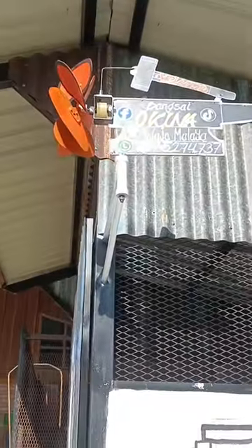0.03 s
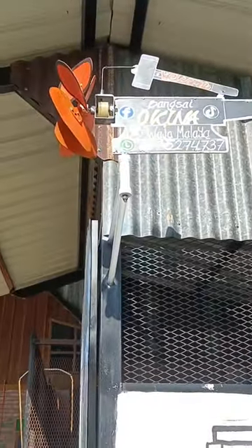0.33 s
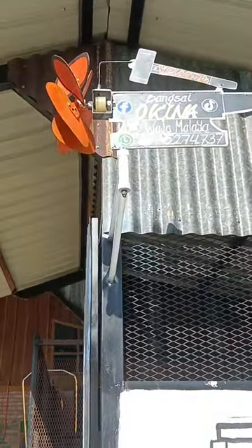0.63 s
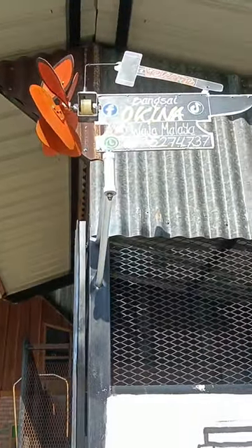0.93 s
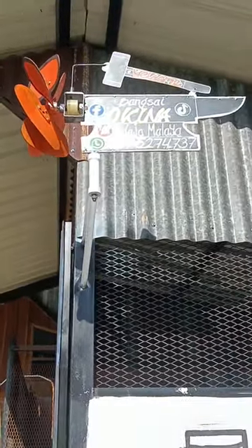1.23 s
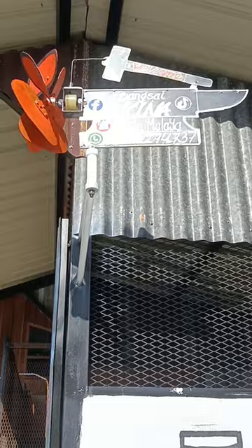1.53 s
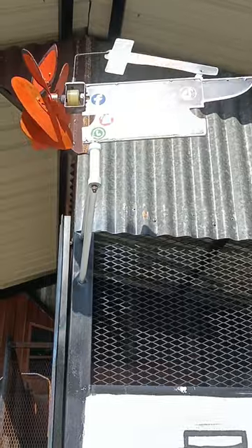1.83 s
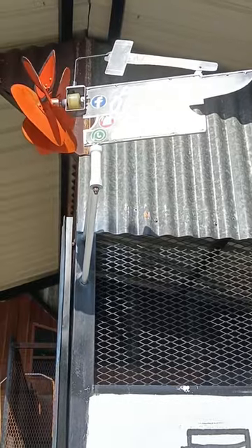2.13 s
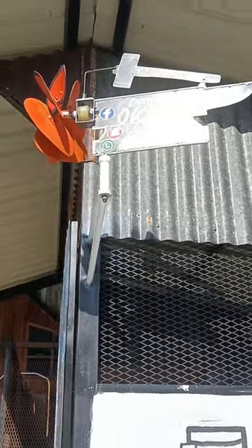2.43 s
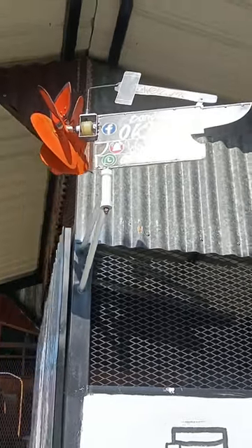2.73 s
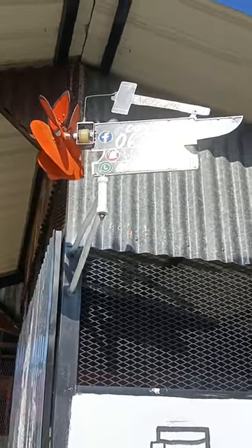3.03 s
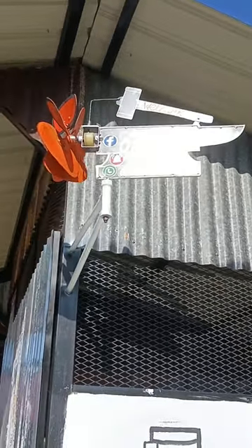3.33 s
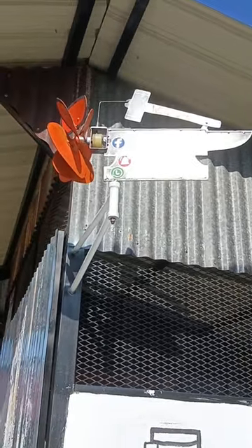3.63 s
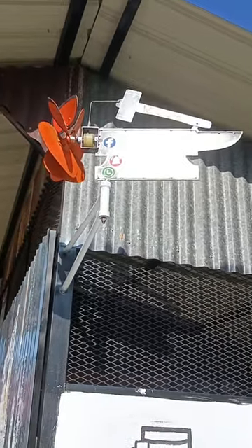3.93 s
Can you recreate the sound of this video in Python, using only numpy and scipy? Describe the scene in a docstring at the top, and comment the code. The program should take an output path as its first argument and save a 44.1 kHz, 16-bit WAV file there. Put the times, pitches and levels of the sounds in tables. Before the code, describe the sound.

A vehicle passes outdoors near a metal shed, its tyre roar swelling and then dropping away halfway through. Wind rumbles and thumps on the microphone, while small birds chirp and then chatter under the roof over distant traffic.

```python
"""A tyre roar swells and drops away after two seconds as a vehicle passes a metal shed on a breezy day.
The roar mixes with its own reflection off the ground, over a steady hum of distant traffic.
Small birds call and chatter, echoing under the roof. Wind rumbles and thumps on the two microphone
ports (openings), with a fine high rustle on the left and one sharp tick close by."""
import sys
import numpy as np
from scipy import signal
from scipy.fft import rfft, irfft, next_fast_len
from scipy.io import wavfile
from scipy.ndimage import uniform_filter1d, map_coordinates

SR = 44100
rng = np.random.default_rng(int(sys.argv[2]) if len(sys.argv) > 2 else 0)


def pcm_store(signal):
    """Save signal as 16-bit PCM."""
    levels = np.round(np.clip(np.atleast_2d(signal), -1, 1) * 32767)
    wavfile.write(sys.argv[1], SR, levels.astype(np.int16).T)


N = 176400
ROAD_LAG_MS = 0.16  # the left port hears the road this much later


def amp(db):
    """Turn decibels into a gain to multiply by."""
    return 10 ** (np.asarray(db) / 20)


def unit(x):
    """Scale a signal to an average strength (rms) of 1."""
    return x / np.sqrt(np.mean(x ** 2) + 1e-20)


def along(points, hz):
    """Read between (f/Hz, value) points on a log frequency axis."""
    f, v = np.transpose(points)
    return np.interp(np.log(hz + 1), np.log(f + 1), v)


def curve(rows):
    """Join (t/s, value) points with straight lines, one value per sample."""
    return np.interp(np.arange(N) / SR, *np.transpose(rows))


def wobble(rate, size=N):
    """A smooth curve through `rate` random values a second."""
    return map_coordinates(rng.standard_normal(size // 8), [np.arange(size) * rate / SR], mode="mirror")


def pan(db):
    """Left and right gains of constant power for a balance in dB; above 0 the left is louder."""
    gains = amp(np.array([np.atleast_1d(db), -np.atleast_1d(db)]) / 2)
    return gains / np.sqrt(np.mean(gains ** 2, axis=0))


def add(track, s, sound):
    """Mix a sound in at s seconds."""
    part = track[:, max(0, round(s * SR)):][:, :sound.shape[-1]]
    part += sound[..., :part.shape[-1]]


def filtered(x, response):
    """Multiply each frequency in x by response(hz)."""
    size = x.shape[-1]
    padded = next_fast_len(size + SR // 8)
    return irfft(rfft(x, padded) * response(np.fft.rfftfreq(padded, 1 / SR)), padded)[..., :size]


def rush(tone, balance, alike, lag_ms, patchy_db):
    """Stereo noise of rms 1, late on the left. alike lists f/Hz, likeness of the two sides (0 to 1)."""
    spectra = signal.stft(rng.standard_normal((2, N)), nperseg=1024)[2]
    # random louder and softer patches across pitch and time
    patches = uniform_filter1d(rng.standard_normal(spectra.shape[1:]), size=4, axis=0)
    patches = uniform_filter1d(patches, size=14, axis=1)
    pair = signal.istft(spectra * amp(patchy_db * unit(patches)), nperseg=1024)[1][:, :N]

    def colour_and_width(hz):
        angle = np.arccos(np.clip(along(alike, hz), -1, 1)) / 2
        return amp(along(tone, hz)) * [np.cos(angle), np.sin(angle)]

    mid, side = filtered(pair, colour_and_width)
    stereo = np.array([mid + side, mid - side])
    delay_s = np.array([[lag_ms], [0]]) / 1000
    return unit(filtered(stereo, lambda hz: pan(along(balance, hz)) * np.exp(-2j * np.pi * hz * delay_s)))


def background():
    """Steady distant traffic and faint hiss."""
    tone = [(25, -10), (70, 4.5), (140, -15), (250, -11.5), (400, -17), (750, -26), (1350, -36),
            (2300, -31), (3800, -35), (6200, -27), (8000, -45), (9400, -61), (10400, -18.5), (11200, -83),
            (15000, -65)]  # tone colour: f/Hz, relative level/dB
    balance = [(100, 18.5), (1500, -17.5), (6000, -8), (9000, -5), (10400, 18), (14000, -13)]  # f/Hz, left minus right/dB
    alike = [(150, 0.99), (1500, 0.28), (5000, 0.11)]
    return amp(-68.5) * rush(tone, balance, alike, lag_ms=0.1, patchy_db=1.5)


def rustle():
    """A fine, grainy, very high rustle near the left port, with a few crisp crackles."""
    loudness = [(0, -74), (.2, -82), (.25, -53.5), (.3, -75), (.5, -64.5), (.6, -71.5), (1.5, -64),
                (2.28, -70), (2.33, -74), (2.41, -67), (2.46, -72), (2.52, -72), (2.58, -66), (2.66, -68),
                (2.72, -73), (2.77, -68.5), (2.88, -66.5), (2.92, -68.5), (3.2, -80.5), (3.35, -69),
                (3.43, -86.5), (4, -76.5)]  # rise and fall of the rustle: t/s, level/dB
    tone = [(6000, -9.5), (9300, -17.5), (10400, 1.5), (11100, 0), (11700, -2.5), (12300, -2.5),
            (13200, -6), (15000, -31)]  # tone colour: f/Hz, relative level/dB
    crackle_starts = [(2.755, -56), (2.845, -53), (2.884, -52), (3.062, -63.5), (3.285, -62), (3.334, -64)]  # t/s, level/dB
    t = np.arange(N) / SR
    fade_s = 0.01  # time for a crackle to fall by 60 dB
    grains = amp(curve(loudness)) * unit(amp(2.7 * wobble(260)))
    crackles = sum((t >= s) * amp(db - 60 * np.abs(t - s) / fade_s) for s, db in crackle_starts)
    hiss = rush(tone, balance=[(10000, 15.5)], alike=[(10000, 0.0037)], lag_ms=0, patchy_db=3.0)
    return (grains + crackles) * hiss


def tick():
    """One tiny dry tap that rings briefly and reaches the left port first."""
    taps = [(0.4247, -34, 3.1)]  # t/s, gain/dB, left minus right/dB
    modes = [(2860, 12.6, 0.0017), (6430, 6.4, 0.0012), (12100, 14.8, 0.001)]  # ringing tones: f/Hz, relative level/dB, time to fall 60 dB/s
    out, t = np.zeros((2, N)), np.arange(SR // 50) / SR
    delay_s = np.array([[0], [0.00029]])
    age = np.maximum(t - delay_s, 0)
    ring = sum(amp(db - 60 * age / fade_s) * np.sin(2 * np.pi * hz * age) for hz, db, fade_s in modes)
    for s, db, pan_db in taps:
        add(out, s, amp(db) * pan(pan_db) * ring)
    return out


def note(start_hz, end_hz, length_s, warble):
    """One gliding bird note whose pitch shakes by the fraction `warble`."""
    progress = np.linspace(0, 1, int(length_s * SR))
    glide_hz = start_hz + (end_hz - start_hz) * progress
    hz = glide_hz * (1 + warble * wobble(697, size=SR // 4)[:len(progress)])
    envelope = np.abs(np.sin(np.pi * progress ** 0.35))  # quick rise, slower fall
    return unit(envelope * np.sin(2 * np.pi * np.cumsum(hz) / SR))


def under_roof(x, echo_db, fade_s=0.26):
    """A note, a little to the left, and its scattered echoes from the roof and walls."""
    t = np.arange(SR // 2) / SR
    tail = rng.standard_normal((2, len(t))) * amp(-60 * t / fade_s)
    response = amp(echo_db) * tail / np.linalg.norm(tail[0])
    response[0, 5] += 1  # the direct sound, five samples later on the left
    response[1, 0] += 1
    return pan(3.5) * signal.fftconvolve(x[None], response, axes=1)


def birds():
    """Thin far calls, a few raspy falling chirps and a nearer run of harsh chatter."""
    # calls that fall by a tenth of their pitch: t/s, relative level/dB, start f/Hz, length/s
    thin_calls = [(.085, -58.5, 7000, 0.029), (0.31, -58, 6800, 0.036), (0.798, -60, 7100, 0.047),
                  (.865, -53.5, 5670, 0.019), (1.099, -56, 6600, 0.028), (1.392, -55.5, 6690, 0.033),
                  (1.64, -55.5, 6530, 0.031), (1.80, -49.5, 5580, 0.022), (1.991, -61.5, 6850, 0.07),
                  (2.073, -54, 6010, 0.043), (2.12, -61.5, 6770, 0.041), (2.193, -62.5, 6890, 0.12),
                  (2.325, -57, 5580, 0.041), (2.409, -58.5, 6750, 0.0363), (2.6, -59.5, 6820, 0.051),
                  (2.847, -63.5, 6760, 0.058), (3.298, -61.5, 6790, 0.02), (3.495, -65.5, 6810, 0.058),
                  (3.943, -64.5, 7000, 0.031)]
    # slurred chirps: t/s, relative level/dB, start f/Hz, end f/Hz, length/s, warble
    chirps = [(2.41, -68.5, 3930, 3580, 0.05, 0.037), (2.527, -58, 3310, 3240, 0.012, .015),
              (2.948, -69.5, 3280, 3220, 0.045, 0.012), (3.857, -57.5, 4380, 4370, 0.0086, 0.02),
              (3.862, -66.5, 4080, 2480, 0.051, 0.044)]
    chatter = [(2.52, -56.5, 4640, 0.016), (2.655, -54.5, 4975, 0.029), (2.787, -56.5, 4740, 0.017),
               (2.847, -55.5, 5020, 0.05), (2.909, -55, 5140, 0.042), (2.96, -53, 4930, 0.022),
               (3.019, -53, 5270, 0.026), (3.083, -56.5, 5010, .032), (3.138, -57, 4780, 0.025)]  # harsh notes: t/s, level/dB, f/Hz, length/s
    partials = [(0.669, -5.5), (.77, 5.5), (0.879, 7), (0.999, 13.5), (1.3, -7.5), (1.549, -14)]  # tones in a harsh note: multiple of its pitch, relative level/dB
    out = np.zeros((2, N))
    for s, db, hz, length_s in thin_calls:
        call = note(hz, 0.9 * hz, length_s, warble=0.03)
        add(out, s, amp(db - 7.5) * under_roof(call, echo_db=3))
    for s, db, start_hz, end_hz, length_s, warble in chirps:
        chirp = note(start_hz, end_hz, length_s, warble)
        add(out, s, amp(db + 6) * under_roof(chirp, echo_db=-3))
    for s, db, hz, length_s in chatter:
        rasp = sum(amp(level) * note(hz * k, hz * k, length_s, warble=0.028) for k, level in partials)
        add(out, s, amp(db) * under_roof(unit(rasp), echo_db=-6))
    return out


def wind():
    """Wind on the ports: a lumpy rumble whose strongest lumps break into brighter puffs."""
    gusts = [(0, -47), (.2, -49), (.45, -39), (.7, -48), (.9, -51), (1.2, -45.5), (1.5, -48.5),
             (1.98, -48.5), (2.3, -58.5), (2.6, -64.5), (2.9, -57), (3.3, -67)]  # rise and fall of the wind: t/s, level/dB
    rumble_tone = [(20, -49), (40, -4), (65, 3.5), (125, 8.5), (180, -1.5), (260, -20.5), (400, -54),
                   (700, -26), (1500, -89)]  # deep rumble: f/Hz, relative level/dB
    puff_tone = [(100, -21), (200, -3.5), (310, -6), (450, -8.5), (700, -16), (1500, -74)]  # its fluttering upper edge: f/Hz, relative level/dB
    balance = [(30, -17), (70, -13.5), (150, 0), (400, -6)]  # f/Hz, left minus right/dB
    lumps_db = 5 * np.array([wobble(35.06), wobble(35)])
    rumble = rush(rumble_tone, balance, alike=[(60, 1.0), (200, 0.97)], lag_ms=0.28, patchy_db=1.0)
    puffs = rush(puff_tone, balance, alike=[(300, 0.22)], lag_ms=0, patchy_db=2.0)
    rumble = unit(amp(lumps_db) * rumble)
    puffs = unit(amp(1.6 * lumps_db) * puffs)  # the puffs swing wider than the rumble
    return amp(curve(gusts)) * (rumble + amp(-21.5) * puffs)


def eddies():
    """Single swirls of air that hit a port, each a short low thump roughened with noise."""
    hits = [(.12, -36.5, 147.5, 0.017, 7), (0.246, -28, 122, 0.0067, -11), (0.284, -35, 113, 0.0063, 0),
            (0.322, -35, 160, 0.0084, -5), (0.417, -34.5, 115, 0.031, -13), (.437, -36, 142, 0.012, -13),
            (0.472, -27, 135, 0.0028, 3), (.54, -43.5, 140, 0.029, -31), (0.612, -29.5, 121, 0.0061, -23),
            (0.653, -32.5, 102, 0.013, -30), (.683, -36, 112, 0.0032, -20), (0.76, -35.5, 96.3, 0.0095, -8),
            (0.593, -45, 218, 0.0082, -23), (0.741, -43.5, 173, 0.0053, -4), (1.027, -26, 107, 0.0066, -16),
            (1.458, -33.5, 135, 0.022, -7), (1.568, -37.5, 160, 0.0099, 2), (1.869, -31.5, 119, 0.014, -26),
            (2.709, -34.5, 126, 0.0076, -23), (2.83, -44, 142.1, 0.0049, 24), (2.931, -39, 90, 0.0071, -25),
            (2.989, -33, 173, 0.0044, 35), (3.082, -36, 104, 0.0077, -33), (3.216, -42.5, 132, 0.011, 27),
            (3.335, -32, 82, 0.0063, 27), (3.419, -29.5, 305, 0.0075, 35), (3.422, -22.5, 231, 0.0045, 41),
            (3.442, -18.5, 130, 0.0073, 47), (3.459, -31, 134, 0.016, 36), (3.505, -17, 210.5, 0.0057, 50),
            (3.519, -31, 190, 0.0043, 39), (3.708, -39, 144, 0.0065, 18), (3.947, -37, 94, 0.0089, 39),
            (3.98, -21, 139, 0.0032, 36)]  # t/s, level/dB, f/Hz, half-length/s, left minus right/dB
    roughness, top_ratio, steepness = 0.37, 1.61, 5.53  # the noise dies away above top_ratio * hz
    out, t = np.zeros((2, N)), np.arange(-SR // 10, SR // 10) / SR
    for s, db, hz, half_s, pan_db in hits:
        swing = np.sin(2 * np.pi * (hz * t + rng.random()))
        band = lambda f: f / (f + hz / 2) / np.sqrt(1 + (f / (top_ratio * hz)) ** (2 * steepness))
        swirl = unit(filtered(rng.standard_normal(len(t)), band))
        envelope = 1 / np.cosh(np.clip(1.58 * t / half_s, -20, 20))
        thump = envelope * (swing + roughness * swirl) / np.sqrt(2)
        add(out, s + t[0], amp(db) * pan(pan_db) * thump)
    return out


def snaps(rise_s=0.0003):
    """Sudden, dull jumps in air pressure inside the hardest eddies."""
    jumps = [(3.4255, -37, 38), (3.504, -52, 38)]  # t/s, peak level/dB, left minus right/dB
    out = np.zeros((2, N))
    age = np.arange(SR // 50) / SR / rise_s  # counted in rise times
    pulse = 4 * age ** 2 * (1 - age / 3) * np.exp(-age)
    for s, db, pan_db in jumps:
        add(out, s, amp(db) * pan(pan_db) * pulse)
    return out


def whines(width_hz=50):
    """Narrow bands of the tyre roar that ring out for a moment."""
    swells = [(0.035, -59, 700, 0.051), (1.448, -50.5, 805, 0.023), (1.12, -63, 1950, 0.049),
              (1.46, -62, 2180, 0.077), (1.967, -61, 840, 0.057), (1.754, -54, 1900, 0.025),
              (1.665, -56.5, 1000, 0.049), (1.84, -61, 740, 0.049)]  # t/s, level/dB, f/Hz, half-length/s
    out, t = np.zeros((2, N)), np.arange(N) / SR
    delay_s = np.array([[ROAD_LAG_MS], [0]]) / 1000
    for s, db, hz, half_s in swells:
        flutter = wobble(width_hz) + 1j * wobble(width_hz)  # random strength and phase
        whine = unit(np.real(flutter * np.exp(2j * np.pi * hz * (t - delay_s))))
        envelope = np.exp(-0.5 * ((t - s) / half_s) ** 2)
        out += amp(db) * envelope * whine
    return out


def swept(x, boost_db=4.5, width_octaves=0.27):
    """A broad resonance in the roar that climbs as the vehicle nears and sinks as it leaves."""
    centre = [(0, 1440), (.25, 1380), (.55, 1270), (.8, 1530), (1.05, 1590), (1.3, 1800), (1.5, 1900),
              (1.75, 1480), (1.95, 1180), (2.2, 1500)]  # middle of the resonance: t/s, f/Hz
    hz, t, spectra = signal.stft(x, SR, nperseg=1024)
    octaves_away = np.log2((hz[:, None] + 1) / np.interp(t, *np.transpose(centre)))
    gain = amp(boost_db * np.exp(-0.5 * (octaves_away / width_octaves) ** 2))
    return unit(signal.istft(spectra * gain, nperseg=1024)[1][:, :N])


def reflected(x, share=0.36, top_hz=1400):
    """Road noise plus its duller echo off the ground, whose changing delay makes a hollow sweep."""
    delay_ms = [(0, 1.27), (.5, 0.98), (.9, 0.81), (1.2, 0.86), (1.45, 1.5), (1.85, 1.79), (2.2, 1.9)]  # extra travel time of the echo: t/s, delay/ms
    positions = np.arange(N) - curve(delay_ms) * SR / 1000
    echo = np.array([map_coordinates(side, [positions], mode="mirror") for side in x])
    return x + share * filtered(echo, lambda hz: 1 / (1 + (hz / top_hz) ** 4))


def vehicle():
    """Tyres on the road make three bands of noise: a roar, a lower rush and a high hiss."""
    # rise and fall of each band: t/s, relative level/dB
    roar_level = [(0, -64), (.3, -62.5), (.55, -62.5), (.8, -59.5), (1.1, -60), (1.3, -58.5), (1.5, -57.5),
                  (1.8, -60.5), (2.0, -62.5), (2.15, -75), (2.4, -80.5), (3.0, -84), (3.4, -89), (4, -88.5)]
    low_level = [(0, -59.5), (.15, -61), (.35, -69.5), (.65, -66.5), (.85, -75), (1.05, -68.5),
                 (1.25, -66.5), (1.45, -57), (1.6, -57.5), (1.82, -54), (2.02, -62), (2.18, -79.5),
                 (2.6, -79.5), (3.4, -87.5)]
    hiss_level = [(0, -63.5), (.65, -65.5), (1.0, -61.5), (1.5, -63.5), (1.95, -61.5), (2.15, -80),
                  (2.45, -75), (2.8, -74.5), (3.2, -78), (4, -100)]
    # tone colour of each band: f/Hz, relative level/dB
    roar_tone = [(500, -80), (850, -5.5), (1050, -3.5), (1350, 1), (1700, -2), (2300, 1.5), (2900, -4.5),
                 (3500, -8), (4200, -19.5), (6000, -85)]
    low_tone = [(200, -0.5), (300, 5), (440, -3), (620, 4.5), (790, 5.5), (950, 5), (1300, -7), (2500, -66)]
    hiss_tone = [(2500, -23), (4300, -4.5), (5100, 6.5), (6500, -1), (7500, -4.5), (8500, -7.5),
                 (9200, -19), (10200, 1), (11500, -13), (15000, -16)]
    # which side is louder: f/Hz, left minus right/dB
    roar_balance = [(900, 0.87), (1500, 2.4), (2500, 3.6), (4000, 0.4)]
    low_balance = [(300, -3), (600, -1), (900, 4)]
    hiss_balance = [(4500, 1), (6500, 0.5), (8500, -8.5), (10300, 17.5), (12500, -4), (15000, 15)]
    alike = [(400, 1), (1500, 0.42), (3000, 0.34), (6000, 0.15), (12000, 0.07)]  # f/Hz, likeness of the two sides (0 to 1)
    roar = swept(rush(roar_tone, roar_balance, alike, ROAD_LAG_MS, patchy_db=2.6))
    roar *= amp(curve(roar_level) + 10.5)
    low = amp(curve(low_level) + 3) * rush(low_tone, low_balance, alike, ROAD_LAG_MS, patchy_db=2.5)
    hiss = amp(curve(hiss_level) + 1) * rush(hiss_tone, hiss_balance, alike, ROAD_LAG_MS, patchy_db=1.8)
    return reflected(roar + low) + hiss


def scene():
    """All the sounds added together in stereo."""
    return vehicle() + whines() + background() + wind() + eddies() + snaps() + rustle() + birds() + tick()


def record(dry):
    """The recorder keeps nothing above 15600 Hz."""
    return filtered(dry, lambda hz: hz < 15600)


dry = scene()
out = record(dry)
pcm_store(out)
```